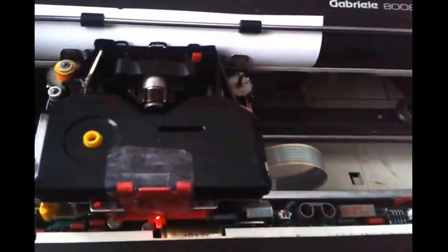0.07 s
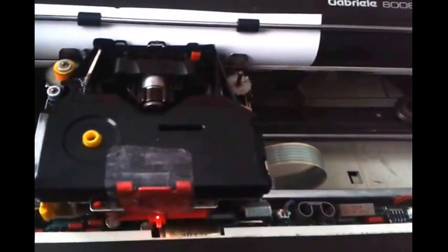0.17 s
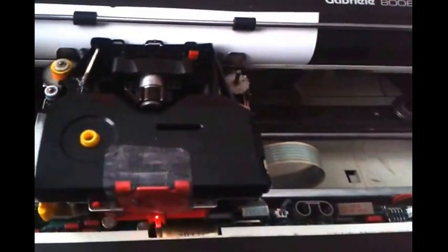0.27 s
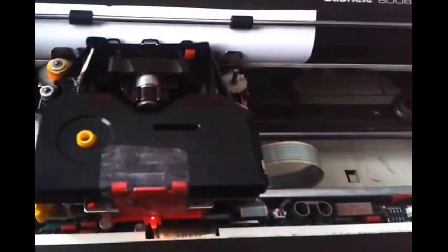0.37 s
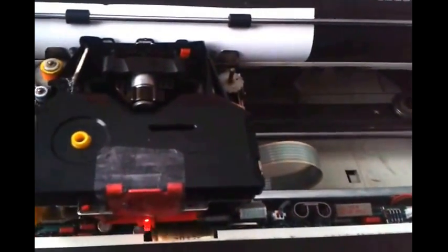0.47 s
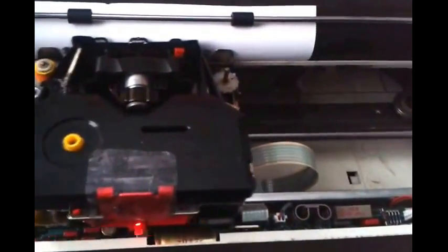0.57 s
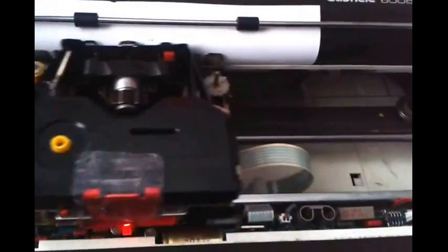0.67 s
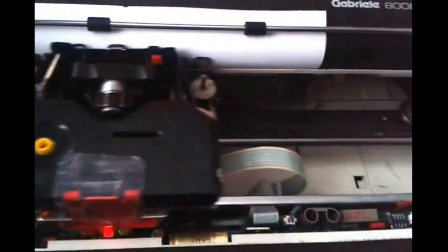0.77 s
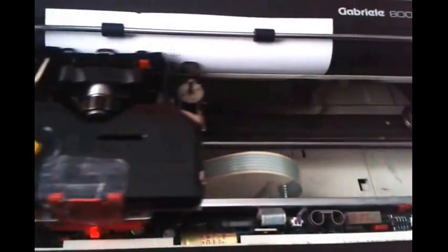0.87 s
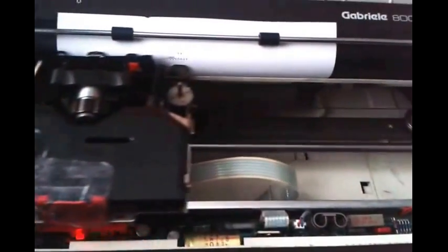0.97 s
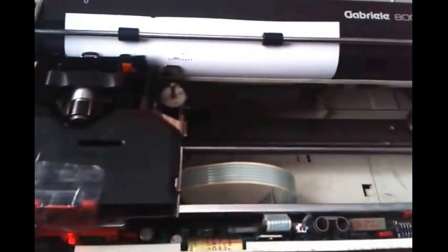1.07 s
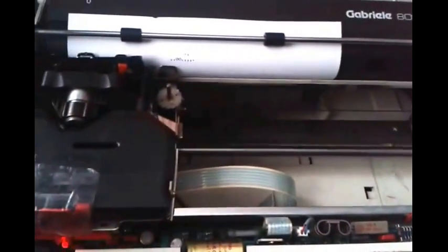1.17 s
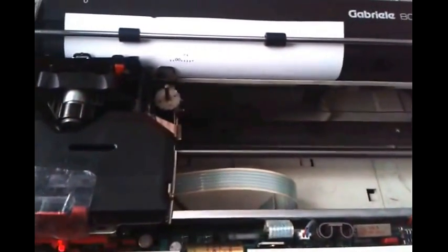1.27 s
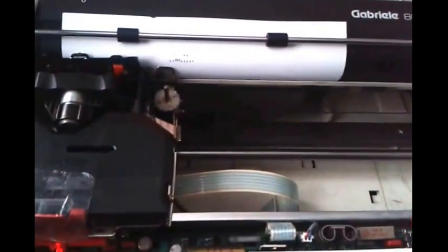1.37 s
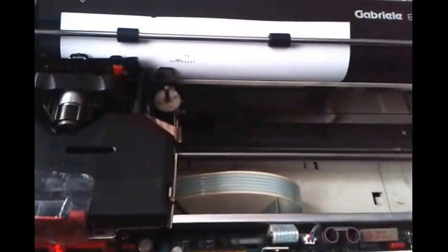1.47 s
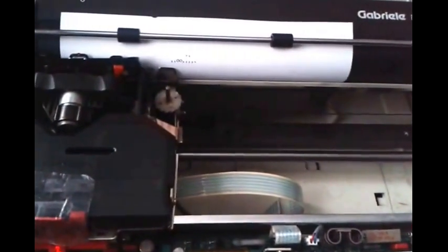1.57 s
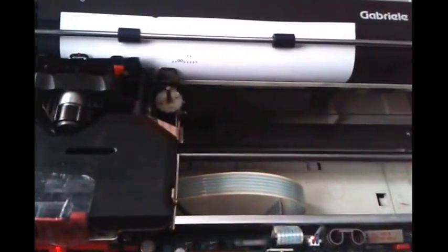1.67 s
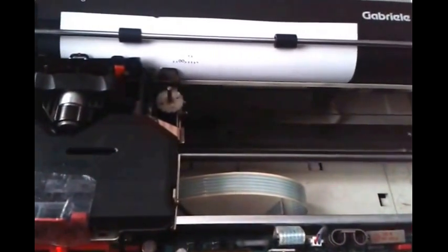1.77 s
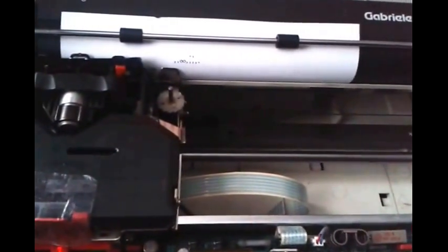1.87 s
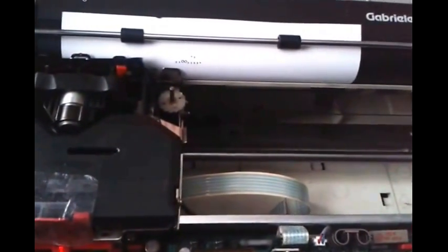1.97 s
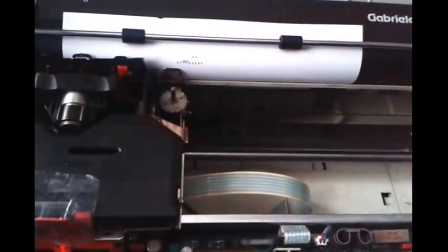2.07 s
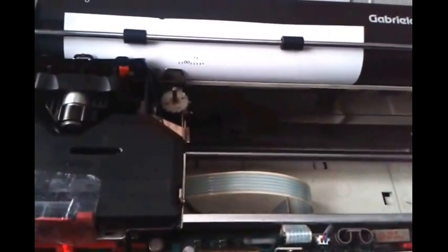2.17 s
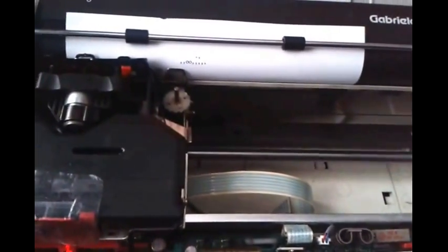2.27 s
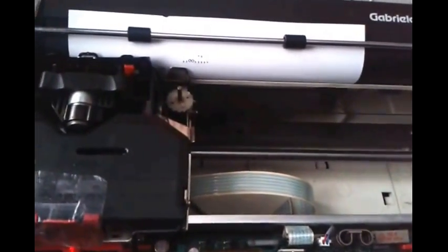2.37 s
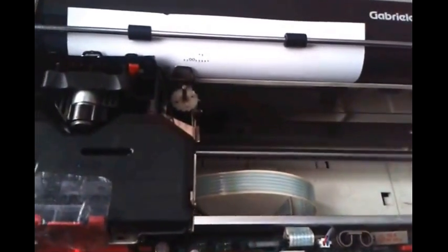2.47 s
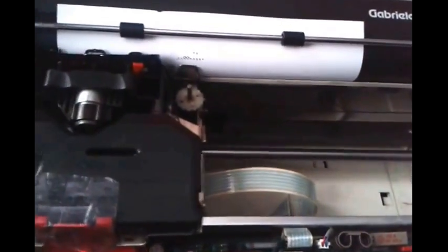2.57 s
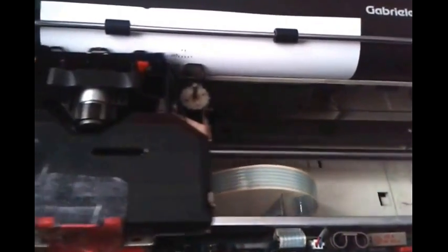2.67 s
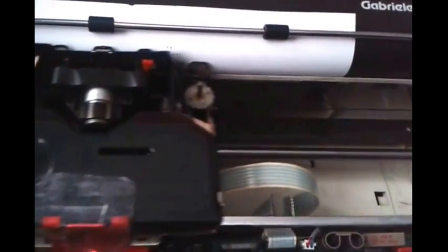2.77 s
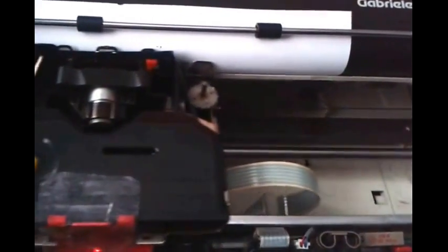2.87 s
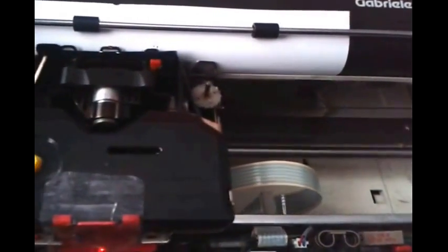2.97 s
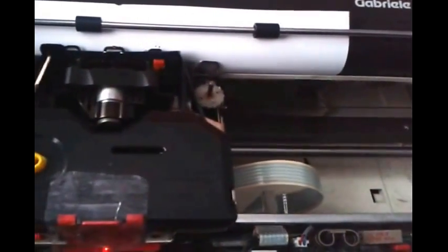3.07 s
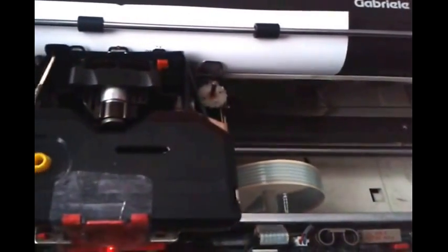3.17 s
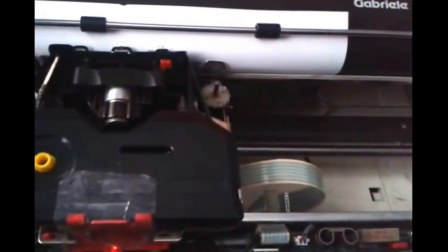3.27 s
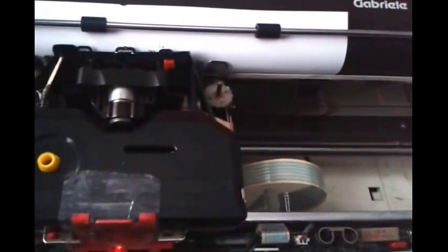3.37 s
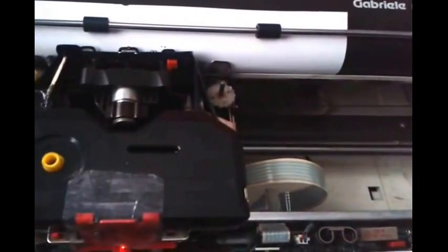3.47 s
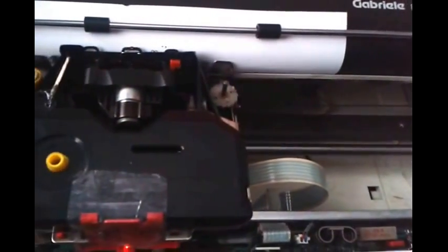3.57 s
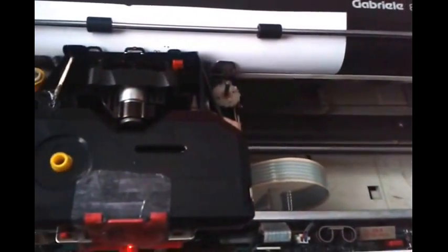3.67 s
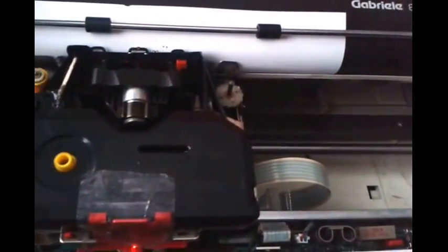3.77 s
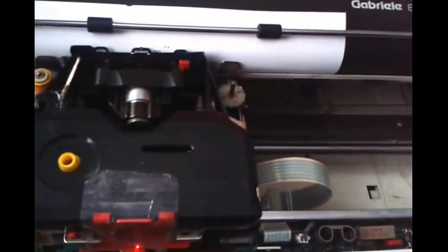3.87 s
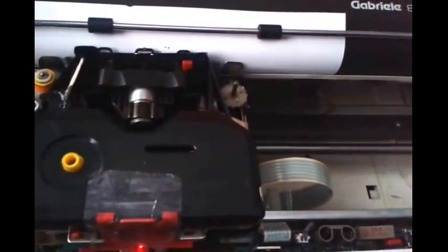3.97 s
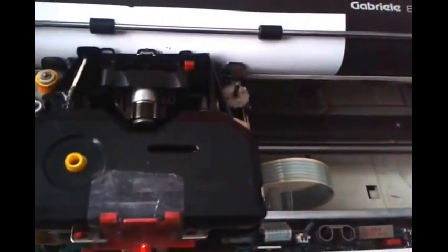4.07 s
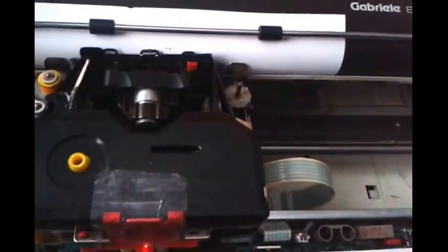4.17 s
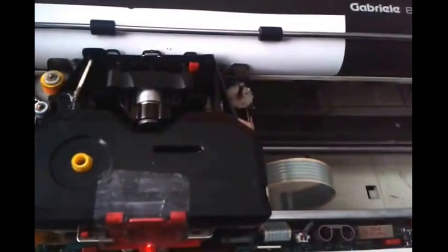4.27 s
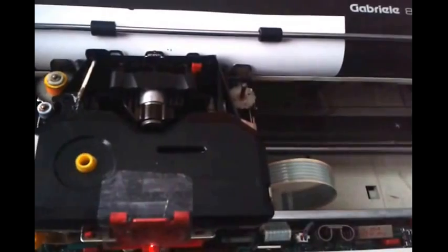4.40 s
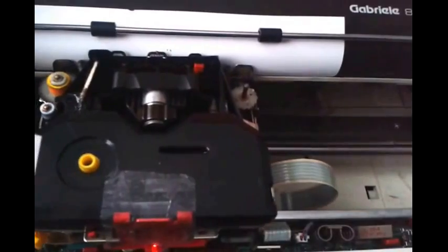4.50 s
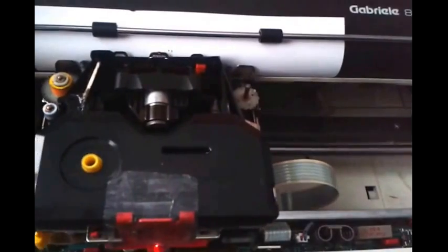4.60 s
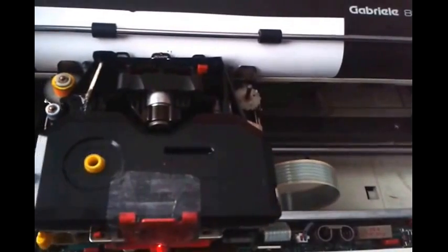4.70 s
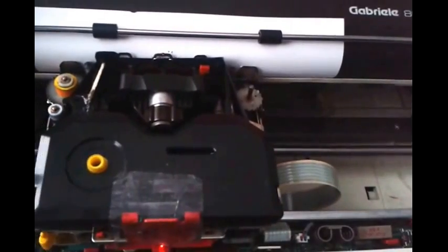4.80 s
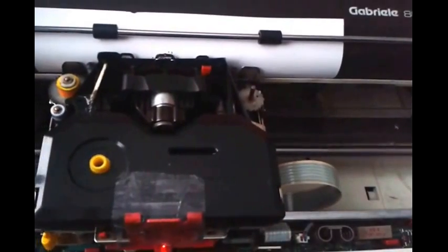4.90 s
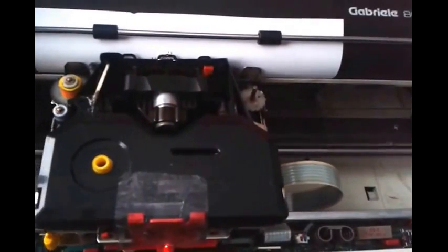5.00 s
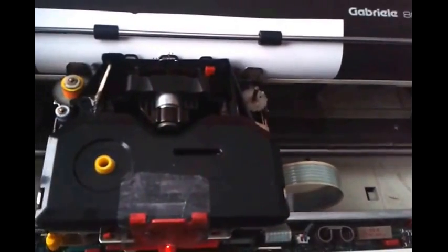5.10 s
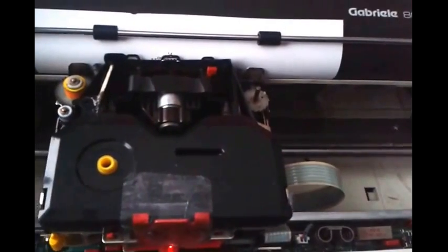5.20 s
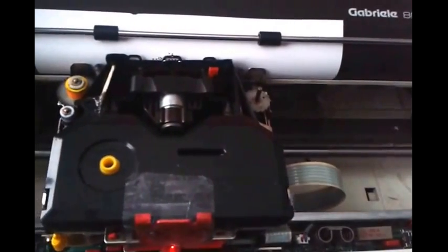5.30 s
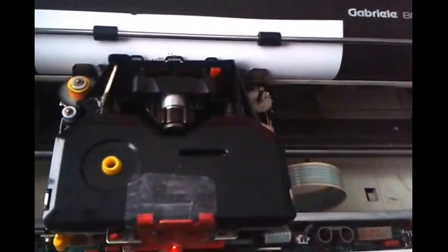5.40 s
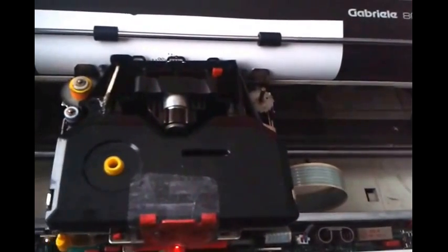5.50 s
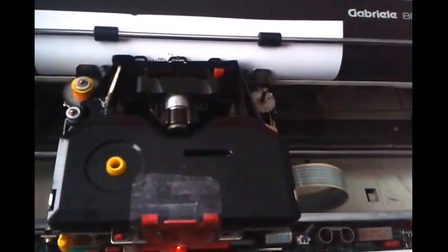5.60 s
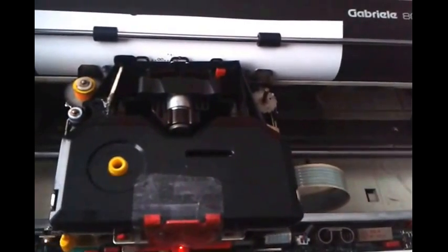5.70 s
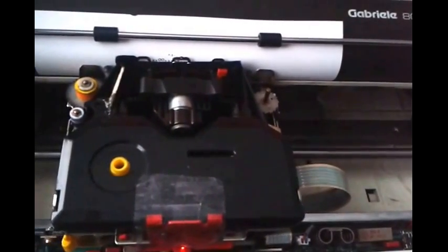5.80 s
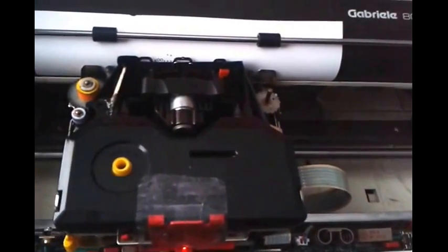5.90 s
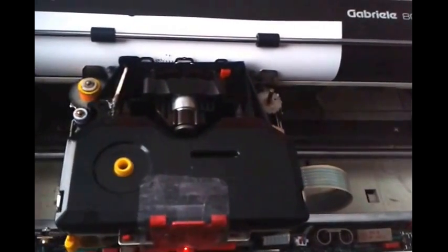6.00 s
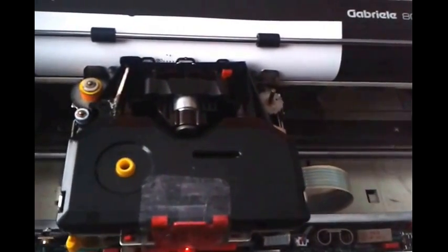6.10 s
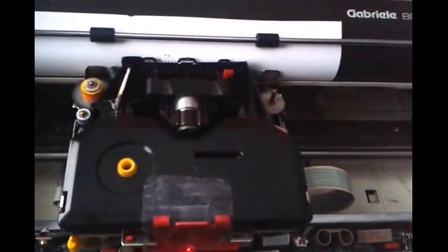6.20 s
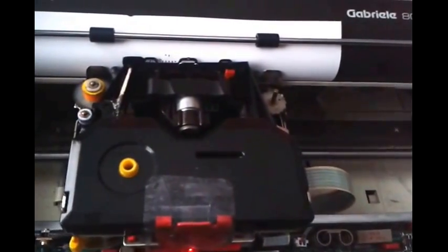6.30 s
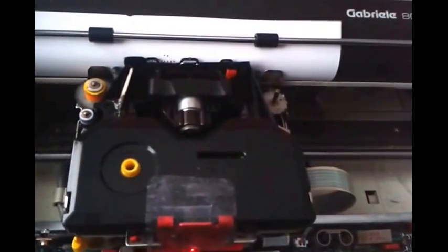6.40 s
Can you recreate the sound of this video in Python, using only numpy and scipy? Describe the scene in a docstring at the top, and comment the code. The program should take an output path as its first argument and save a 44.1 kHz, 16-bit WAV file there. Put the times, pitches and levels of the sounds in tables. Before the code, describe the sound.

A daisy-wheel electronic typewriter prints on its own, very close to the microphone in a small room. Two sharp hammer strikes give way to clacking latches, rattling gears and the whir of the carriage motor. After a pause of about a second the carriage moves again, then rapid, even strikes follow in short runs, with small motors ticking between the blows. A faint hush lies behind.

```python
"""A daisy-wheel typewriter printing by itself, cover open, a hand's width from a phone microphone.
The hammer drives a spoke against the platen and rebounds; ribbon and wheel motors step on before the
next blow. Between lines latches clack, gears knock and the carriage motor whirs along its rail.
This close, the loudest blows overload the phone; a short room echo and a steady hush lie behind."""
import sys
import numpy as np
from scipy import signal
from scipy.fft import rfft, irfft, next_fast_len
from scipy.io import wavfile
from scipy.ndimage import uniform_filter1d

SR = 44100
rng = np.random.default_rng(int(sys.argv[2]) if len(sys.argv) > 2 else 0)


def persist_wave(psi):
    """Save psi, clipped to +-1, as 16-bit WAV."""
    counts = np.round(np.clip(psi, -1, 1) * 32767).astype(np.int16)
    wavfile.write(sys.argv[1], SR, np.atleast_2d(counts).T)


N = 284445

# runs of blows: start_s, letters_from_mid_line, treble_db of each spoke
PRINT_RUNS = [(.042, 5, [0., -2.5]), (3.1063, -10, [-5.5, -1.5, -5.5, -4.5]),
              (3.9014, -5, [-3.5, 0., 0., -3.]), (4.5915, -1, [.5]), (4.7661, 0, [.5, 0., -3.]),
              (5.2837, 3, [.5]), (5.4543, 4, [.5, .5, .5, .5, -2.5, -2.])]
# ringing parts: pitch_hz, level_db, t60_s, polarity (opposed pairs swell and beat)
PLATEN_MODES = [(1798.6, 4.5, 0.024, -1), (2187, 2.5, 0.024, 1), (2514, 1, 0.017, 1),
                (2820, -11.5, 0.043, -1), (3463, -2.5, 0.022, -1), (3606, 2, 0.017, 1),
                (3846, -4, 0.028, -1), (4128, -6, 0.029, 1), (5170, -11, 0.011, -1),
                (5880, -27.5, 0.021, 1)]  # platen and hammer frame
ROLLER_MODES = [(546, -5, 0.052, 1), (1195.4, -3.5, 0.08, -1), (1387, -4.5, 0.053, 1),
                (1590, -3.5, .04, -1)]  # rubber roller
BRACKET_MODES = [(3950, -4.5, 0.045, 1), (4160, -6.5, 0.043, -1), (4720, -7, .04, 1)]  # the hammer's steel bracket
GEAR_MODES = [(1630, -8, 0.032, 1), (2490, 11, 0.026, -1), (3750, -9, .02, 1), (4600, -15, .015, -1)]
PAWL_MODES = [(1700, 2.5, 0.04, 1), (1970, 0, 0.031, -1)]
# hammer and spoke bounces: delay_s, housing_db, metal_db, length_s
BOUNCES = [(.001, -5.5, -10.5, 0.0015), (.0065, -10.5, -17, 0.0023), (0.009, -19.5, -31.5, 0.0035),
           (0.018, -16, -32.5, 0.0079), (0.0196, -29.5, -18, 0.004), (0.0252, -20, -19, .0035)]
# gear knocks: first_s, last_s, first_rate_hz, last_rate_hz, first_db, peak_db, last_db,
# peak_place (0-1), pitch_hz
GEAR_TRAINS = [(0.342, 0.4, 99.5, 90.5, -27.5, -23.5, -27, 0.52, 2480),
               (0.432, 0.502, 98.9, 91.4, -26.5, -25, -34, 0.49, 2950),
               (0.537, 0.607, 76.1, 77, -51, -24, -45, 0.46, 2950),
               (1.104, 1.159, 78.1, 64.1, -43, -23, -27.5, 0.71, 2560),
               (1.194, 1.27, 74, 61.9, -27, -23, -40, 0.65, 2560),
               (2.424, 2.509, 80.1, 73, -25.5, -23, -29, 0.75, 2443),
               (2.527, 2.606, 66.2, 87, -30, -25.5, -42, 0.52, 2570),
               (2.625, 2.66, 75.4, 139, -41, -34, -40, .4, 2460),
               (2.851, 2.899, 108, 96, -35.5, -38, -40, .4, 2460),
               (2.911, 2.964, 80.2, 65.8, -35.5, -26.5, -28, 0.77, 2490),
               (2.996, 3.057, 77.6, 56.9, -25, -23, -28, 0.47, 2480),
               (3.742, 3.762, 84.8, 68, -31, -19, -21, .45, 2550),
               (3.796, 3.851, 76, 58.6, -34, -18, -31.5, 0.34, 2460)]
# feed motors starting, then braking, timed from the blow: the first eight columns above, then
# metal_relative_db, chassis_relative_db, length_s
FEED_TRAINS = [(0.032, 0.056, 112.9, 118.2, -20.5, -22.5, -24, .6, -12.5, -13.5, 0.005),
               (0.066, 0.125, 92.54, 57.55, -28, -20, -33.5, 0.33, -22.5, -5.5, 0.0042)]
# latches and levers: start_s, level_db, metal_relative_db, length_s
LATCH_CLACKS = [(0.292, -25, -19, 0.0017), (0.312, -4, -7, 0.0012), (0.33, -30, -25, 0.0015),
                (0.408, -24, -3.5, 0.0048), (0.478, -19, -20, 0.002), (0.488, -26, -13, 0.002),
                (0.605, -44, -1, 0.001), (0.637, -13.5, -6, 0.0023), (0.643, -11.5, -12, 0.0015),
                (0.664, -12.5, -7, 0.0034), (0.684, -16.5, -7, 0.019), (0.6961, -4, -4.5, 0.0029),
                (0.859, -36, -8, 0.0025), (0.97, -37, -10, 0.0022), (1.2, -25.5, -35, 0.0044),
                (2.485, -23, -14, 0.0024), (3.645, -25.5, 7.5, 0.0044), (3.711, -20.5, -15, 0.0033),
                (4.666, -16.5, 0.5, 0.0032), (5.357, -24.5, 3, 0.0044)]
# carriage pawl catching: start_s, level_db
PAWL_TAPS = [(2.46, -21), (2.476, -27), (2.501, -23.5), (2.51, -31)]
# carriage travel, one list a run: time_s, whir_db, rumble_relative_db
CARRIAGE_RUNS = [
    [(0, -42.5, -6), (.04, -49.5, -15)],
    [(.33, -37, -14), (.46, -44.5, 0.5), (.63, -44.5, -8)],
    [(.74, -58, -20), (.9, -48, -15), (1.1, -50.5, -4), (1.13, -43.5, -6), (1.22, -34.5, -4.5),
     (1.27, -47, -1.5), (1.34, -63, -9)],
    [(2.42, -37.5, -8.5), (2.55, -48.5, -4), (2.66, -47, -13), (2.9, -49.5, -13), (3.1, -48, -3)],
    [(3.72, -36, -5.5), (3.85, -40.5, -6), (3.9, -52, -10)],
]
# carriage motor, one list a long run: time_s, pitch_hz, level_db
HUM_RUNS = [
    [(.72, 168, -55), (.82, 205, -55), (.92, 180, -53), (1.0, 140, -55), (1.1, 96, -55), (1.17, 70, -68)],
    [(2.58, 95, -66), (2.66, 125, -57), (2.75, 155, -54), (2.84, 142, -55), (2.92, 105, -61),
     (3.0, 70, -70)],
]
# the hum's overtones: multiple, relative_db
HUM_OVERTONES = [(2, -3), (4, -4), (5, -8)]
# noise colours: frequency_hz, level_db
HOUSING_COLOUR = [(60, -25), (128, -11), (239, -6.5), (301, -15), (372, -6), (996, -4.5), (1420, -3),
                  (2300, 3.5), (3050, 0), (4060, -1.5), (6040, -14), (9000, -24), (11700, -44.5)]
CHASSIS_COLOUR = [(100, -21.5), (220, -1), (400, -4), (950, 0), (1400, -7), (2500, -36)]
LATCH_COLOUR = [(120, -49), (300, -17), (1150, -7.5), (1420, -4.5), (2600, 1), (4330, -3.5), (4680, -9.5),
                (9000, -24), (11700, -49.5)]
METAL_COLOUR = [(2940, -13.5), (5000, 3), (7250, -6), (10100, -7), (13700, -7), (15800, -7.5)]
SPOKE_PEAK = [(7750, 3.5), (8150, -4)]  # spokes and levers each add a peak to the metal
LEVER_PEAK = [(11900, -6.5), (12700, -0.5)]
WHIR_COLOUR = [(290, -43.5), (500, -6.5), (1350, -6.5), (1570, -1), (2120, -6), (2450, -4), (3000, -8),
               (5830, -16.5), (6270, -25.5), (15800, -37.5)]
HUSH_COLOUR = [(24, -41.5), (40, -8.5), (123, -3.5), (400, -19), (1090, -13.5), (1200, -19.5), (1540, -9.5),
               (1790, -17.5), (2480, -17), (3610, -28), (15800, -42)]
# ring times of the bodies: frequency_hz, t60_s
HOUSING_DECAY = [(100, 0.89), (500, 0.2), (2000, 0.024), (8000, 0.057)]
CHASSIS_DECAY = [(200, .12), (1200, 0.13)]
METAL_DECAY = [(5000, 0.022), (15000, 0.011)]

BLOW_GAP_S, CONTACT_S, ROLLER_SWELL_S = .17145, .0001, .0033
BLOW_DB, ROLLER_DB, BRACKET_DB, FEED_GEAR_DB = 4.5, -14.5, -26, -8.5
HARD_HZ, THIN_HZ = 3000, 850  # hard spokes ring the modes above; the platen radiates little below
MID_DB_PER_LETTER, REST_DB_PER_LETTER, MID_RISE_PER_LETTER = .86, 1.09, .0015
FIRM_DB, GEAR_LIMIT_DB = -30, -27  # knocks that take up the slack; that ring the gear to its limit
OVERTONE_HZ, WHINE_HZ, WHINE_DB = 149, 5850, -13
ROOM_T60_S, ROOM_DB, HUSH_DB = .39, -17.5, -57.5
BASS_HZ, OVERLOAD, TOP_HZ = 30, .69, 15900


def hammer():
    """Each blow is one short half-sine push on the platen; the rubber roller swells in after it."""
    strikes, roller = np.zeros((2, N))
    push = np.sin(np.pi * np.clip(np.arange(20) / SR / CONTACT_S, 0, 1))
    for s, spoke_db, letter in blows():
        table = [(hz, db + spoke_db * (hz > HARD_HZ), *rest) for hz, db, *rest in platen(letter)]
        strike = np.convolve(modes(table, scatter_db=1), push / push.sum())
        add(strikes, s, undb(BLOW_DB) * strike)
        thud = modes(ROLLER_MODES, scatter_db=1)
        swell = 1 - np.exp(-np.arange(len(thud)) / SR / ROLLER_SWELL_S)
        add(roller, s, undb(ROLLER_DB) * thud * swell)
    return highpass(strikes, THIN_HZ, order=2) + roller


def blows():
    """One blow a hammer cycle: start_s, spoke_db, letter."""
    return [(s + k * BLOW_GAP_S, db, letter + k)
            for s, letter, spokes in PRINT_RUNS for k, db in enumerate(spokes)]


def platen(letter):
    """The platen's modes as struck at a place along the line; the middle ones shift in pitch."""
    return [(hz * (1 + MID_RISE_PER_LETTER * letter), db + MID_DB_PER_LETTER * letter, *rest)
            if 2000 < hz < 2700 else (hz, db + REST_DB_PER_LETTER * letter, *rest)
            for hz, db, *rest in PLATEN_MODES]


def rattle(shake):
    """After each blow, bounces and motor steps shake housing and metal and ring the steel bracket."""
    bracket = np.zeros(N)
    contacts = [(*row, 1) for row in BOUNCES]
    # the metal jingles 1.9 times as long as a motor step
    contacts += [(delay, db, metal_db, length, 1.9) for delay, db, metal_db, _, length in feed_steps()]
    for s, spoke_db, letter in blows():
        jolts = np.zeros(SR // 5)
        for delay, db, metal_db, length, smear in contacts:
            late, housing_luck, metal_luck = rng.standard_normal(3)
            delay *= 1 + .02 * late
            add(shake["housing"], s + delay, undb(db + .01 * letter + 2 * housing_luck) * chatter(length))
            hardness_db = spoke_db + 2 * metal_luck
            add(jolts, delay, undb(db + hardness_db) * chatter(length))
            add(shake["metal"], s + delay, undb(metal_db + hardness_db) * chatter(smear * length))
        detune = 1 + .015 * rng.standard_normal()
        steel = modes([(hz * detune, *rest) for hz, *rest in BRACKET_MODES], scatter_db=2.5)
        add(bracket, s, undb(BRACKET_DB) * ring(jolts, steel))
    return bracket


def feed_motors(shake):
    """Ribbon and wheel motors shake the chassis at each step and knock the gear teeth as they brake."""
    teeth = np.zeros(N)
    braking = FEED_TRAINS[1][:8]
    for s, _, _ in blows():
        for delay, _, _, chassis_db, length in feed_steps():
            add(shake["chassis"], s + delay, undb(chassis_db) * chatter(length))
        for delay, db in train(*braking):
            add(teeth, s + delay, undb(db + FEED_GEAR_DB) * modes(GEAR_MODES, scatter_db=2.5))
    return teeth


def feed_steps():
    """Motor steps to the next letter: delay_s, housing_db, metal_db, chassis_db, length_s."""
    return [(delay, db, db + metal_db, db + chassis_db, length)
            for *steps, metal_db, chassis_db, length in FEED_TRAINS for delay, db in train(*steps)]


def latches(shake):
    """Each latch clacks, jolting the chassis and the metal levers."""
    for s, db, metal_db, length in LATCH_CLACKS:
        for part, relative_db in ("latch", 0), ("chassis", -17), ("levers", metal_db):
            add(shake[part], s, undb(db + relative_db) * chatter(length))


def gears(shake):
    """Teeth knock as a motor speeds up or brakes; firm knocks take up the slack and shake the rest."""
    teeth = np.zeros(N)
    for *knocks, gear_hz in GEAR_TRAINS:
        for s, db in train(*knocks):
            s += .0004 * rng.standard_normal()
            db += rng.standard_normal()
            add(teeth, s, gear_knock(gear_hz * (1 + .008 * rng.standard_normal()), db))
            passed_db = db + .35 * (db - FIRM_DB)
            add(shake["housing"], s, undb(passed_db - 1) * chatter(.0015))
            add(shake["chassis"], s, undb(passed_db - 7) * chatter(.002))
            add(shake["metal"], s, undb(passed_db - 18.5) * chatter(.00047))
    return teeth


def gear_knock(pitch_hz, knock_db):
    """One knock of the teeth: the firmer, the more the side modes ring beside the main one."""
    main_hz = GEAR_MODES[1][0]
    side_db = .8 * max(knock_db - FIRM_DB + 6.5, 0)
    table = [(hz * pitch_hz / main_hz, db + side_db * (hz != main_hz), *rest)
             for hz, db, *rest in GEAR_MODES]
    return undb(min(knock_db, GEAR_LIMIT_DB) + 1.5) * modes(table, scatter_db=2.5)


def pawl():
    """The carriage pawl catches in a few ringing taps as a run starts."""
    taps = np.zeros(N)
    for s, db in PAWL_TAPS:
        add(taps, s, undb([db]))
    return ring(taps, modes(PAWL_MODES))


def bodywork(shake):
    """Plastic housing, latches, small metal parts and chassis each ring with the shaking they get."""
    return (dense_body(shake["housing"], HOUSING_COLOUR, HOUSING_DECAY)
            + dense_body(shake["latch"], LATCH_COLOUR, HOUSING_DECAY)
            + dense_body(shake["metal"], sorted(METAL_COLOUR + SPOKE_PEAK), METAL_DECAY)
            + dense_body(shake["levers"], sorted(METAL_COLOUR + LEVER_PEAK), METAL_DECAY)
            + dense_body(shake["chassis"], CHASSIS_COLOUR, CHASSIS_DECAY))


def carriage():
    """Belt and rail whir with a quick flicker over a low rumble."""
    t, out = np.arange(N) / SR, np.zeros(N)
    flicker_db = 2 * unit(uniform_filter1d(rng.standard_normal(N), 220))
    whir = noise(WHIR_COLOUR, N) * undb(flicker_db)
    rumble = noise([(60, -31), (130, 2.5), (220, 7), (450, 2.5), (800, -47.5)], N)
    for run in CARRIAGE_RUNS:
        s, db, rumble_db = np.transpose(run)
        edges_s = [s[0] - .002, s[0], s[-1], s[-1] + .01]
        moving = np.interp(t, edges_s, [0, 1, 1, 0]) if s[0] > 0 else t < s[-1]
        out += moving * undb(np.interp(t, s, db)) * (whir + undb(np.interp(t, s, rumble_db)) * rumble)
    return out


def carriage_motor():
    """The motor hums at its turning speed, richer in overtones as it slows, under a wavering whine."""
    t, out = np.arange(N) / SR, np.zeros(N)
    waver = unit(uniform_filter1d(rng.standard_normal(N), 400))
    sway = unit(uniform_filter1d(uniform_filter1d(rng.standard_normal(N), 600), 600))
    whine_phase = 2 * np.pi * np.cumsum(WHINE_HZ * (1 + .0045 * waver)) / SR
    for run in HUM_RUNS:
        s, hz, db = np.transpose(run)
        hum_hz, hum_db = np.interp(t, s, hz), np.interp(t, s, db)
        turn = 2 * np.pi * np.cumsum(hum_hz * (1 + .02 * sway)) / SR
        overtones = sum(undb(level) * np.sin(k * turn) for k, level in HUM_OVERTONES)
        overtones /= 1 + (hum_hz / OVERTONE_HZ) ** 4
        hum = undb(hum_db + 2.5 * sway) * (np.sin(turn) + overtones)
        whine = undb(hum_db + WHINE_DB + 4 * waver) * np.sin(whine_phase)
        out += ((t > s[0]) & (t < s[-1])) * (hum + whine)
    return out


def room(machine):
    """The room's dull echo reaches the microphone 5 ms behind the machine, over a steady hush."""
    tail = noise([(60, -6), (300, 0), (6000, 0), (15000, -5)], 16384) * fade(ROOM_T60_S, 16384)
    echo = np.concatenate([np.zeros(220), tail / np.sqrt(np.sum(tail ** 2))])
    return undb(ROOM_DB) * ring(machine, echo) + undb(HUSH_DB) * noise(HUSH_COLOUR, N)


def train(first_s, last_s, first_hz, last_hz, first_db, peak_db, last_db, peak_place):
    """(time_s, level_db) of knocks whose gaps change evenly, stretched to fill the span."""
    count = max(int(round(2 * (last_s - first_s) / (1 / first_hz + 1 / last_hz))), 1)
    place = np.append(0, np.cumsum(np.linspace(1 / first_hz, 1 / last_hz, count)))
    place /= place[-1]
    levels_db = np.interp(place, [0, peak_place, 1], [first_db, peak_db, last_db])
    return zip(first_s + (last_s - first_s) * place, levels_db)


def modes(table, scatter_db=0):
    """A few modes ringing to one tap, each at a scattered level; peak 1."""
    t = np.arange(2400) / SR
    tone = sum(polarity * undb(db + scatter_db * rng.standard_normal())
               * np.sin(2 * np.pi * hz * t) * fade(t60, len(t)) for hz, db, t60, polarity in table)
    return tone / np.abs(tone).max()


def dense_body(shake, colour, decay):
    """Countless modes: each half octave of noise fills with the shaking power and dies at its own pace."""
    size = next_fast_len(N, real=True)
    octave = np.log2(np.fft.rfftfreq(size, 1 / SR) + 1)
    spectrum, out = rfft(noise(colour, size)), 0
    for mid_hz in 40 * 2 ** np.arange(0, 9, .5):
        keep = np.exp(-2 * np.log(1000) / SR / read(decay, mid_hz))
        stored = signal.lfilter([1 - keep], [1, -keep], shake ** 2)
        band = np.clip(1 - 2 * np.abs(octave - np.log2(mid_hz)), 0, 1)
        out += irfft(spectrum * band, size)[:N] * np.sqrt(stored)
    return out


def chatter(length_s):
    """A burst of tiny contacts that swells fast and dies over length_s."""
    age = np.arange(1600) / SR / length_s
    return rng.standard_normal(1600) * np.minimum(4 * age, 1) * np.exp(-age)


def ring(force, body):
    """A force track sounding through a body."""
    return signal.oaconvolve(force, body)[:N]


def noise(colour, size):
    """Coloured noise of rms 1."""
    hz = np.fft.rfftfreq(size, 1 / SR) + 1
    return unit(irfft(rfft(rng.standard_normal(size)) * undb(read(colour, hz)), size))


def fade(t60, size):
    """Exponential decay, 60 dB in t60 seconds."""
    return np.exp(-np.log(1000) * np.arange(size) / SR / t60)


def read(table, hz):
    """A table's value on a log frequency axis."""
    table_hz, values = np.transpose(table)
    return np.interp(np.log(hz), np.log(table_hz), values)


def add(track, s, piece):
    """Mix a piece into a track at s seconds."""
    i = int(max(s, 0) * SR)
    track[i:i + len(piece)] += piece[:max(len(track) - i, 0)]


def highpass(x, hz, order=1):
    """Roll off the bass."""
    return signal.sosfilt(signal.butter(order, hz, "high", fs=SR, output="sos"), x)


def undb(db):
    """Decibels to gain."""
    return 10 ** (np.asarray(db) / 20)


def unit(x):
    """Scale to rms 1."""
    return x / np.sqrt(np.mean(x ** 2))


def scene():
    """The typewriter close up, the room behind it, in mono."""
    shake = {part: np.zeros(N) for part in ("housing", "latch", "metal", "levers", "chassis")}
    machine = hammer() + rattle(shake) + feed_motors(shake) + gears(shake) + pawl()
    latches(shake)
    machine += bodywork(shake) + carriage() + carriage_motor()
    return (machine + room(machine))[None]


def record(dry):
    """The phone microphone drops the bass, its input stage flattens the blows, the top is cut."""
    thin = highpass(dry, BASS_HZ)
    flattened = thin / (1 + np.abs(thin / OVERLOAD) ** 8) ** (1 / 8)
    top_cut = signal.firwin(301, TOP_HZ, fs=SR, window=("kaiser", 8))
    return signal.oaconvolve(highpass(flattened, hz=115), top_cut[None], "same")


dry = scene()
out = record(dry)
persist_wave(out)
```